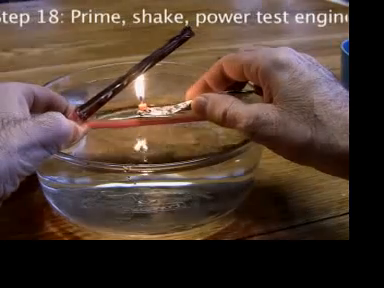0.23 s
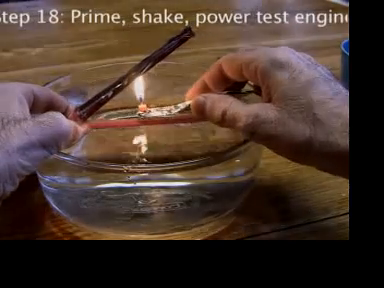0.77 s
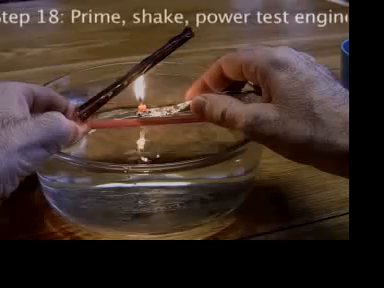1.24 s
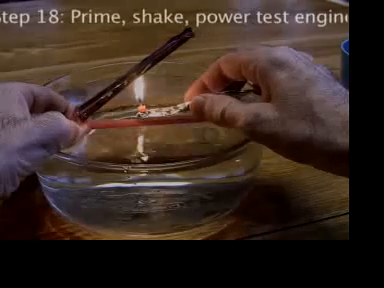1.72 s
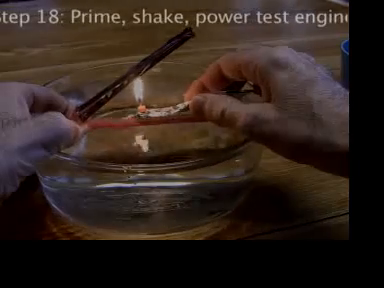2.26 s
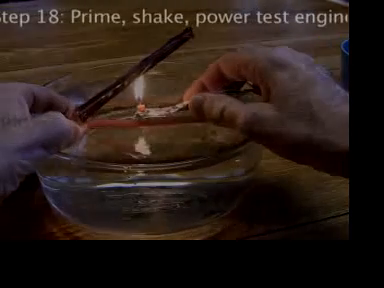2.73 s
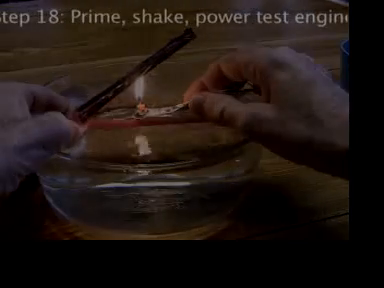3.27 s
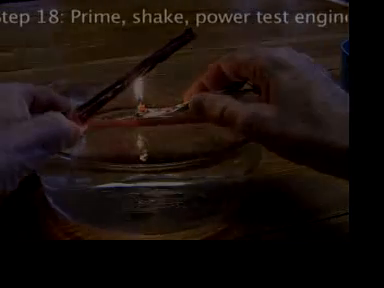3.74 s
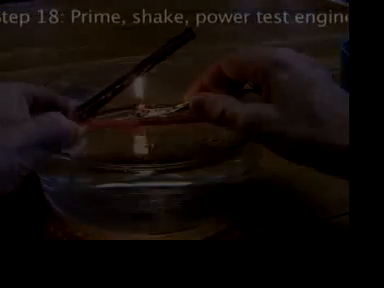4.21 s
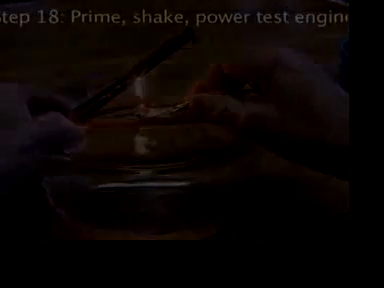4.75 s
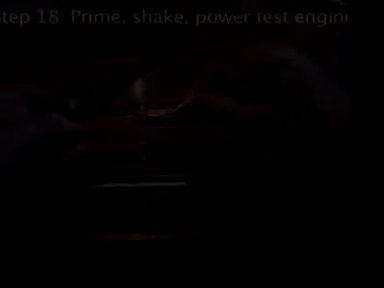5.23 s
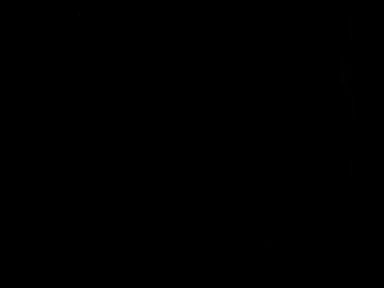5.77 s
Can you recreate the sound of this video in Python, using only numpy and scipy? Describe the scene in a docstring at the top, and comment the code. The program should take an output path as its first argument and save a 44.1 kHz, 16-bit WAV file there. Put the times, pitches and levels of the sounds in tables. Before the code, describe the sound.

The thin metal lid of a tiny candle-heated boiler snaps in and out in a fast, even, tinny patter. Faint at first, it soon grows much louder, with small crackly ticks between the pops. Past the middle the rhythm falters, turns to snaps and dull rebounds, and dies down. Hands bump softly and a finger briefly rubs the glass bowl. Close stereo microphones catch a little indoor ring.

```python
"""In a small room, a homemade pop-pop steam engine runs over a candle, held on a glass bowl of water. About ten
times a second steam snaps the thin boiler lid out; it ticks as it relaxes and pops back as the steam condenses.
The steam swells, then fades while the lid works loose: then it snaps on the way in and goes out with just a
dull rebound. Hands knock softly and a finger rubs the bowl. Two close microphones also pick up quick echoes,
faint ringing from the room's echo and the bowl, the room's tail and a hush of air."""
import sys
import numpy as np
from scipy import signal
from scipy.fft import rfft, irfft, next_fast_len
from scipy.io import wavfile

SR = 44100
rng = np.random.default_rng(int(sys.argv[2]) if len(sys.argv) > 2 else 0)


def materialize(psi):
    """Save the field psi as 16-bit PCM at rate SR to the path in sys.argv[1].

    A 1-D psi becomes a single channel; in a 2-D psi each row is a channel.
    """
    bounded = np.clip(np.atleast_2d(psi).T, -1, 1)
    quanta = np.round(bounded * 32767).astype(np.int16)
    wavfile.write(sys.argv[1], SR, quanta)


N = 264114
CLICK_T = np.arange(1024) / SR  # the time axis of one click, in seconds
DIRECTIONS = 4  # each click leaves the lid in one of these, picked at random
LOOSE_S = 3.45  # from this time on the lid is loose


def undb(db):
    """Turn decibels into a number to multiply by."""
    return 10 ** (np.asarray(db) / 20)


def unit(x):
    """Give a click the same energy as 3 ms of sound at level 1."""
    return x / np.sqrt(np.sum(x ** 2) / (.003 * SR))


def add(out, s, x):
    """Mix x into out, starting at s seconds."""
    i = max(int(s * SR), 0)
    out[i:i + len(x)] += x[:max(len(out) - i, 0)]


def at_time(table, s, column=1):
    """Read a table at s seconds, sliding between its rows."""
    table = np.array(table)
    return np.interp(s, table[:, 0], table[:, column])


def at_pitch(table, hz):
    """Read a table at a frequency, sliding between its rows on an octave scale."""
    table = np.array(table)
    return np.interp(np.log(hz + 1), np.log(table[:, 0]), table[:, 1])


def colour(x, shape):
    """Turn the lows and highs of x up or down, following rows of f/Hz, level/dB."""
    n = next_fast_len(x.shape[-1]) * 2
    cepstrum = irfft(np.log(undb(at_pitch(shape, np.fft.rfftfreq(n, 1 / SR)))))
    # fold the filter so that nothing sounds ahead of its input
    cepstrum[1:n // 2] *= 2
    cepstrum[n // 2 + 1:] = 0
    return irfft(rfft(x, n) * np.exp(rfft(cepstrum)))[..., :x.shape[-1]]


def ring(hz, swell_s):
    """A note damped by water: it swells for swell_s and dies almost at once."""
    return unit(CLICK_T * np.exp(-CLICK_T / swell_s) * np.sin(2 * np.pi * hz * CLICK_T))


def crack(swell_s, shape):
    """A crease runs through the foil: a burst of tiny slips with one sharp break at its peak."""
    afterglow = undb(-22) * np.exp(-CLICK_T / .0018)
    envelope = CLICK_T / swell_s * np.exp(-CLICK_T / swell_s) + afterglow
    burst = rng.standard_normal(len(CLICK_T)) * envelope
    burst[int(swell_s * SR)] += undb(-2.5) * np.linalg.norm(burst)  # the break
    return unit(colour(burst, shape))


# the tone of the still air: f/Hz, level/dB
AIR_COLOUR = [(25, 2), (70, -3), (150, -30), (500, 1), (1200, -10), (3000, -2), (8000, -34), (16000, -37)]
def still_air():
    """A faint, steady hush, partly the same on the left and right."""
    air = colour(rng.standard_normal((2, N)) + rng.standard_normal(N), AIR_COLOUR)
    return undb(-68.5) * air / air.std()


def cycles(settle_s=.045, longest_s=.106):
    """Start and length of each engine cycle: it begins at the lid's last move before a rest."""
    moves = np.sort([row[0] for row in SNAPS + REBOUNDS])
    starts = moves[np.diff(moves, append=np.inf) > settle_s]
    starts = np.r_[2 * starts[0] - starts[1], starts]  # the engine is already running
    return zip(starts, np.minimum(np.diff(starts, append=np.inf), longest_s))


# a stuck crease lets go, mostly just after a pop: t/s, level/dB
STUCK_CREASES = [(.008, -40.5), (0.2392, -35), (0.3284, -36), (0.5993, -36), (0.6907, -37), (.7772, -40.5),
                 (.8763, -40), (1.0597, -37.5), (1.254, -33), (1.3496, -29.5), (1.6295, -21.5),
                 (1.724, -22.5), (1.822, -20.5), (1.911, -18), (2.306, -19), (2.4073, -20.5), (2.9027, -27),
                 (3.1145, -23), (3.525, -24.5), (3.6341, -28.5), (3.8608, -29)]
# its tone, with levels relative to the click: body level/dB, body f/Hz, crack level/dB
STUCK_TONE = (-6.5, 1266, -7.5)
# two small creases flip in every cycle: share of the cycle, then the same three tone columns
CREASES = [(.182, -7, 1080, -10), (.459, 1, 1144, -5)]
# how loud these two are: t/s, first level/dB, second level/dB
CREASE_LEVELS = [(0, -43, -38), (.15, -50, -38.5), (.55, -50, -47.5), (1.15, -46.5, -47), (1.5, -31, -29),
                 (1.85, -33, -26.5), (2.2, -24, -25.5), (2.9, -26, -26.5), (3.3, -31, -28),
                 (3.7, -32.5, -33), (4.15, -30, -28), (4.8, -30.5, -32.5), (5.3, -38.5, -39),
                 (5.6, -35.5, -40), (5.95, -47.5, -49.5)]
# their pitch shifts as the boiler runs dry: t/s, pitch multiplier
CREASE_PITCH = [(0, 1.007), (3.3, 1.016), (4.4, 1.004), (5.35, 0.99), (5.65, 1.08)]
# the loose lid springs back with a dull click: t/s, level/dB
REBOUNDS = [(3.462, -18), (3.5121, -20.5), (3.6149, -21), (3.6677, -26), (4.2027, -21), (4.3047, -22),
            (4.4112, -24), (4.5183, -26), (4.617, -60), (4.7256, -27), (4.8318, -28.5), (4.9391, -29),
            (5.0446, -29.5), (5.1488, -32.5), (5.255, -33), (5.3577, -33.5), (5.465, -30.5), (5.516, -28),
            (5.621, -31.5), (5.7173, -34), (5.825, -35), (5.9325, -38.5)]
# its tone, with levels relative to the click: body level/dB, body f/Hz, crack level/dB
REBOUND_TONE = (-7, 1380, -8)
def flips():
    """List every small flip of the foil: t/s, level/dB, then its three tone columns."""
    rows = [(s, db, *REBOUND_TONE) for s, db in REBOUNDS]
    rows += [(s, db, *STUCK_TONE) for s, db in STUCK_CREASES]
    for start, length in cycles():
        lag_s = .0023 if start > LOOSE_S else 0  # creases flip later in the loose lid
        for k, (share, body_db, body_hz, crack_db) in enumerate(CREASES):
            s = start + share * length + lag_s
            louder_db, higher = rng.standard_normal(2)
            db = at_time(CREASE_LEVELS, s, column=k + 1) + louder_db
            hz = body_hz * (at_time(CREASE_PITCH, s) + .044 * higher)
            rows.append((s, db, body_db, hz, crack_db))
    return [row for row in rows if row[0] > 0]


def blip(hz, swell_s, sag):
    """A short note that starts low and rises by the share sag as the foil tightens."""
    pitch = hz * (1 + sag / 3 - sag * np.exp(-CLICK_T / .0017))
    turns = np.cumsum(pitch) / SR
    return unit(CLICK_T * np.exp(-CLICK_T / swell_s) * np.sin(2 * np.pi * turns))


# the tone of the small cracks in ticks and pops: f/Hz, level/dB
SMALL_CRACK = [(100, 1), (1000, 14.5), (3000, 2), (4400, 10.5), (6300, -5), (7500, -18), (10000, -26),
               (12000, -34), (16000, -36)]
def ticks():
    """Each flip of the foil makes a thin click and a rounded blip from the boiler body."""
    out = np.zeros((DIRECTIONS, N))
    for s, db, body_db, body_hz, crack_db in flips():
        lid = undb(-3) * ring(hz=2350 * (1 + .15 * rng.standard_normal()), swell_s=.00075)
        rim = undb(-9) * ring(hz=3230, swell_s=.00055)
        body = undb(body_db) * blip(body_hz, swell_s=.0013, sag=.18)
        thud = undb(-14) * ring(hz=600, swell_s=.00031)
        slips = undb(crack_db) * crack(swell_s=.001, shape=SMALL_CRACK)
        add(out[rng.integers(DIRECTIONS)], s, undb(db) * (lid + rim + body + thud + slips))
    return out


def push(hz, width_s):
    """One stroke of the lid pushes the air: a pressure peak between two dips."""
    t = CLICK_T - 2 * width_s
    hump = np.exp(-.5 * (t / width_s) ** 2)
    soft_start = np.tanh(CLICK_T / width_s) ** 2
    motion = hump * np.sin(2 * np.pi * hz * t) * soft_start
    return unit(np.diff(motion, prepend=0))


def shudder(swell_s):
    """The boiler and its pipes shake: a short, dull puff of noise."""
    noise = rng.standard_normal(len(CLICK_T)) * CLICK_T * np.exp(-CLICK_T / swell_s)
    shape = [(200, -19), (700, -13.5), (1200, -10), (1900, -10), (2700, -12), (12000, -65)]
    return unit(colour(noise, shape))


# the strength of the steam, which drives the pops and the body note of the snaps: t/s, level/dB
STEAM = [(0, -31), (.35, -33.5), (.55, -37.5), (1.17, -40), (1.3, -28.5), (1.6, -20.5), (1.88, -15.5),
         (2.02, -21.5), (2.3, -16), (2.72, -15), (3.2, -16), (3.5, -20.5), (3.7, -23.5), (4.25, -22.5),
         (4.7, -31.5), (5.5, -35.5), (5.95, -44.5)]
# the lid is sucked back in: t/s
POP_TIMES = [0.0532, 0.144, 0.2333, 0.323, 0.4096, 0.4991, 0.59, 0.6818, .7711, 0.864, 0.9598, 1.052,
             1.1461, 1.2442, 1.3374, 1.441, 1.5335, 1.6236, 1.7176, 1.8154, 1.9067, 1.9981, 2.0938, 2.1934,
             2.2936, 2.3952, 2.4972, 2.5928, 2.6949, 2.7975, 2.8977, 3.002, 3.1085, 3.208, 3.2206, 3.32,
             3.4237, 3.5108, 3.7382, 3.8509, 3.9624]
def pops():
    """Steam condenses and the lid caves in with one round stroke; a shudder follows."""
    out = np.zeros((DIRECTIONS, N))
    for s in POP_TIMES:
        gain = undb(at_time(STEAM, s) - .36)
        direction = out[rng.integers(DIRECTIONS)]
        crack_db = rng.normal(-16.5, 3.5)
        stroke = push(hz=1540 * (1 + .033 * rng.standard_normal()), width_s=.0003)
        thud = undb(-16) * ring(hz=473, swell_s=.00072)
        shake = shudder(swell_s=.0017)
        slips = undb(crack_db) * crack(swell_s=.00033, shape=SMALL_CRACK)
        add(direction, s, gain * (stroke + thud + slips))
        shake_db = rng.normal(-8.5, 2)
        add(direction, s + .002213, gain * undb(shake_db) * shake)
    return out


# soft knocks from the hands that hold the engine: t/s, level/dB, f/Hz
KNOCKS = [(0.054, -45, 55), (3.487, -32, 55), (4.195, -34.5, 145), (4.244, -37, 68), (4.805, -38, 55)]
def hand_knocks(swell_s=.0038):
    """Dull, low knocks travel through the bowl and the table."""
    out, t = np.zeros(N), np.arange(SR // 8) / SR
    envelope = t / swell_s * np.exp(1 - t / swell_s)
    for s, db, hz in KNOCKS:
        add(out, s, undb(db) * envelope * np.sin(2 * np.pi * hz * t))
    return out


# the tone of the tight lid's crack: f/Hz, level/dB
TIGHT_CRACK = [(100, -78), (1000, 13.5), (3000, -5), (4300, 10), (5200, 8), (6300, 6.5), (7300, -8),
               (9500, -15.5), (12000, -21.5), (16000, -34)]
# the loose lid cracks lower, with a small low bump: f/Hz, level/dB
LOOSE_CRACK = [(100, -32), (600, 6.5), (1500, -30), (3700, 12.5), (5000, 8.5), (6700, -7.5), (8000, -11.5),
               (9500, -15), (12000, -26.5), (16000, -37)]
# the snaps change as the lid heats and loosens: t/s, body f/Hz, crack level/dB relative to the snap
SNAP_TONE = [(0, 1190, -14), (1.1, 1158, -12.5), (1.9, 1205, -17), (2.4, 1350, -14), (2.8, 1250, -21.5),
             (3.35, 1250, -18), (3.8, 1595, -16), (4.3, 1423, -10), (4.7, 926, -9.5), (5.45, 1070, -13.5)]
# the lid snaps, outward while tight and inward once loose: t/s, level/dB, lid f/Hz
SNAPS = [(.077, -31, 2380), (0.1745, -31.5, 2380), (0.2675, -28.5, 2270), (0.3579, -28, 2280),
         (0.4421, -28, 2250), (.531, -36, 2230), (0.6267, -26.5, 2260), (0.7176, -28, 2180),
         (.8071, -27, 2330), (0.9, -28, 2300), (.993, -39.5, 2470), (1.0881, -28.5, 2380),
         (1.1825, -38.5, 1970), (1.2796, -22.5, 2410), (1.3704, -24.5, 2350), (1.4664, -22.5, 2380),
         (1.5631, -18.5, 2380), (1.6592, -10, 2290), (1.754, -12.5, 2010), (1.8503, -9.5, 2300),
         (1.9393, -9.5, 2300), (2.0301, -16, 1830), (2.1261, -16.5, 2010), (2.2275, -16.5, 2500),
         (2.3288, -10.5, 2390), (2.4296, -11.5, 2360), (2.5287, -17.5, 2470), (2.6303, -9.5, 1820),
         (2.7327, -13, 2380), (2.8339, -14, 2450), (2.9353, -14.5, 2060), (3.041, -14.5, 1910),
         (3.1463, -15, 2980), (3.2514, -12, 2410), (3.3577, -16, 2490), (3.4865, -13, 2950),
         (3.5915, -17, 2900), (3.7743, -22, 1790), (3.885, -22, 2380), (3.9967, -17.5, 1810),
         (4.0674, -18.5, 2090), (4.1007, -19.5, 1840), (4.1722, -16, 2140), (4.2839, -19.5, 2120),
         (4.3864, -18, 2300), (4.494, -18.5, 2240), (4.694, -17.5, 2250), (4.8039, -17.5, 2310),
         (4.9101, -19.5, 2290), (5.0171, -21.5, 2250), (5.124, -21.5, 2310), (5.2233, -22.5, 2320),
         (5.3259, -24, 2240), (5.4293, -26, 2240), (5.4923, -28, 2920), (5.5912, -30.5, 2970),
         (5.6905, -32, 2920), (5.7966, -34.5, 2858), (5.903, -37, 2930)]
def snaps():
    """Steam buckles the lid: it rings with its stiff rim, the boiler shakes and the pushed air thuds."""
    out = np.zeros((DIRECTIONS, N))
    for s, db, lid_hz in SNAPS:
        loose = s > LOOSE_S
        hard = lid_hz > 2700  # hard snaps have a stronger crack
        body_db = at_time(STEAM, s) - 2.5 - db  # the body follows the steam, not the snap's level
        body_hz = 870 if hard and loose else at_time(SNAP_TONE, s)
        crack_db = -6.5 if hard else at_time(SNAP_TONE, s, column=2)
        lid = undb(-4.5) * ring(lid_hz, swell_s=.00095)
        rim = undb(-5.5 if loose else -8.5) * ring(hz=3230, swell_s=.00068)
        body = undb(body_db) * ring(body_hz, swell_s=.00068)
        thud = undb(-12.5 + .32 * body_db) * ring(hz=590 if loose else 500, swell_s=.00054)
        slips = undb(crack_db) * crack(swell_s=.00082, shape=LOOSE_CRACK if loose else TIGHT_CRACK)
        add(out[rng.integers(DIRECTIONS)], s, undb(db) * (lid + rim + body + thud + slips))
    return out


# the tone of a finger rubbing the bowl's rim: f/Hz, level/dB
RUB_COLOUR = [(25, -14), (70, 12), (150, -7), (230, -10), (500, -35), (2000, -60)]
# the one rub: t/s, length/s, level/dB
RUB = (4.15, 0.21, -44)
def finger_rub():
    """A finger slides on the bowl with a low rumble that swells and fades."""
    s, length_s, db = RUB
    out, n = np.zeros(N), int(length_s * SR)
    rumble = colour(rng.standard_normal(N), RUB_COLOUR)
    add(out, s, undb(db) * np.hanning(n) * rumble[:n] / rumble.std())
    return out


# the sound that lingers in the room: f/Hz, level/dB, fade/s (the time to drop by 60 dB)
ROOM_TAIL = [(59, 8, 0.78), (145, -8.5, 0.34), (219, 1.5, 0.97), (340, -13.5, 0.3), (890, -2, 0.21),
             (1170, -14.5, 0.19), (1624, -6.5, 0.92), (2080, -14.5, 0.48), (3580, -9.5, 0.16),
             (4200, -5.5, 0.15), (5700, -12.5, 0.33), (10300, -2, 0.11), (16000, -2, 0.96)]
def room_tail(t):
    """Countless echoes blur into left and right noise; each band fades at its own speed."""
    hz = np.fft.rfftfreq(len(t), 1 / SR)
    shared, difference = np.exp(2j * np.pi * rng.random((2, len(hz)))) * np.sqrt(len(t))
    # the microphones sit close together and hear nearly the same in the middle pitches
    width_db = [(60, 13), (250, -6.5), (1000, -18.5), (2200, -17.5), (4500, -7.5), (9000, 0), (16000, 12)]
    width = undb(at_pitch(width_db, hz))
    side = width * difference
    noise = np.array([shared + side, shared - side]) / np.sqrt(1 + width ** 2)
    noise *= undb(at_pitch(ROOM_TAIL, hz))
    centres, tail = np.array(ROOM_TAIL)[:, 0], 0
    build_up = 1 - np.exp(-(t / .009) ** 2)
    for share, (_, _, fade_s) in zip(np.eye(len(ROOM_TAIL)), ROOM_TAIL):
        fade = undb(-60 * t / fade_s) * build_up
        band = irfft(noise * at_pitch(np.c_[centres, share], hz), len(t))
        tail = tail + band * fade / np.sqrt(np.sum(fade ** 2))
    return tail


# quick echoes off the ceiling and nearby surfaces: delay t/s, level/dB
ECHOES = [(.0078, -14.5), (.0084, -19), (.0157, -26)]
# the tone of these echoes: f/Hz, level/dB
ECHO_COLOUR = [(300, -4.5), (1250, -1), (2350, -1), (3300, 3), (6000, -6.5), (14000, 6)]
# faint, steady-pitched ringing from the room's echo and the bowl: f/Hz, level/dB, fade/s
RINGING_TONES = [(921, -53, .23), (1095, -59, .17), (1190, -57, .17), (1321, -59.5, .18), (1445, -59, .17),
                 (1495, -59, .17), (1560, -60, .17), (1712, -58, .18), (1799, -61, .15), (3457, -65, .15)]
def surroundings():
    """What one click turns into: the click itself, echoes, faint ringing tones and the room's tail."""
    t = np.arange(16384) / SR
    near = np.zeros(len(t))
    near[0] = 1
    bounce = colour(near[:len(CLICK_T)], ECHO_COLOUR)
    for delay_s, db in ECHOES:
        add(near, delay_s, undb(db) * bounce)
    for hz, db, fade_s in RINGING_TONES:
        near += undb(db) * undb(-60 * t / fade_s) * np.sin(2 * np.pi * hz * t)
    return near + room_tail(t)


def scene():
    """The engine in its room, with still air and the sounds of the hands."""
    engine = snaps() + ticks() + pops()
    heard = 0
    for direction in engine:  # each direction stirs its own room tail
        heard += signal.oaconvolve(direction[None], surroundings(), axes=1)[:, :N]
    return heard + still_air() + hand_knocks() + finger_rub()


def record(dry):
    """Two slightly unlike microphones thin the bass, lift the highs, cap peaks and cut above 16 kHz."""
    left = colour(dry[0], [(30, -23.5), (90, -11), (140, -6), (700, 4),
                           (2000, 3.28), (4500, -1.74), (8000, 12), (16000, 16)])
    right = colour(dry[1], [(30, -20.5), (90, -12.5), (140, -3.5), (700, 4),
                            (2000, 3.14), (4500, 1), (8000, 12.5), (16000, 11.5)])
    top_cut = signal.ellip(8, .1, 70, 16000, fs=SR, output="sos")
    return signal.sosfilt(top_cut, np.clip([left, right], -.95, .95))


dry = scene()
out = record(dry)
materialize(out)
```